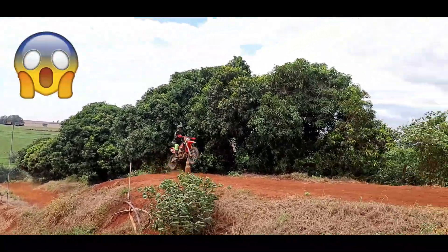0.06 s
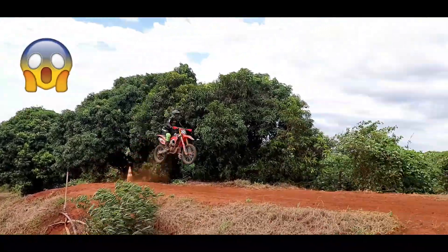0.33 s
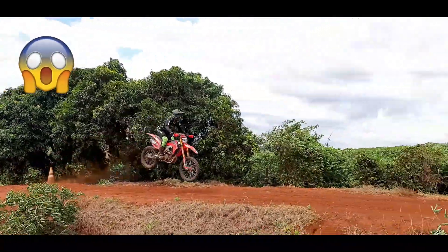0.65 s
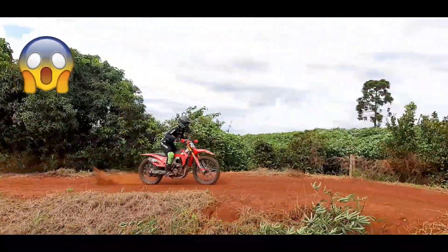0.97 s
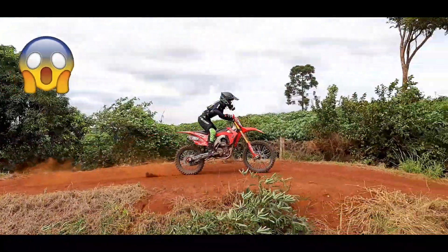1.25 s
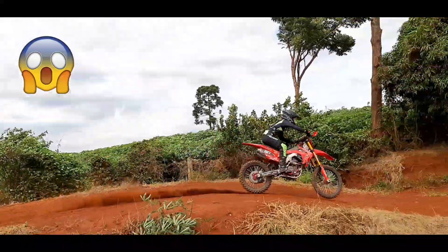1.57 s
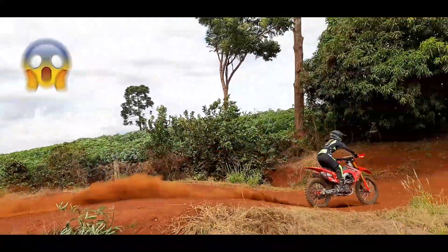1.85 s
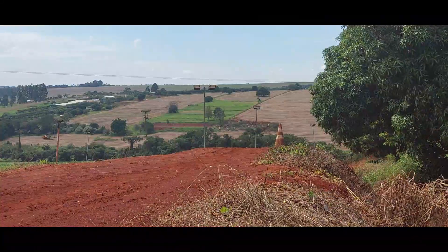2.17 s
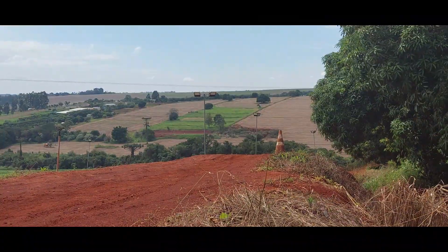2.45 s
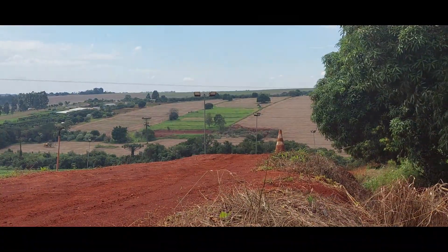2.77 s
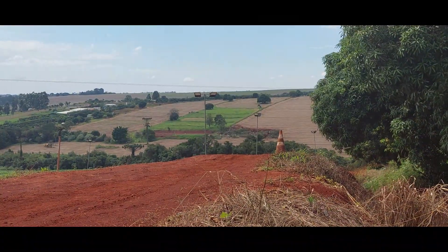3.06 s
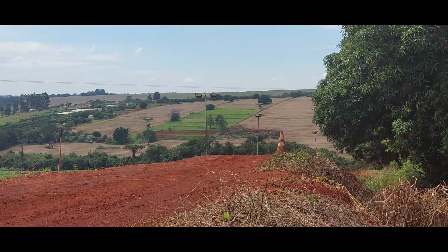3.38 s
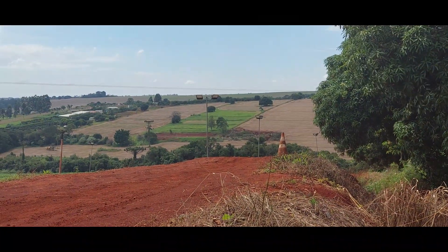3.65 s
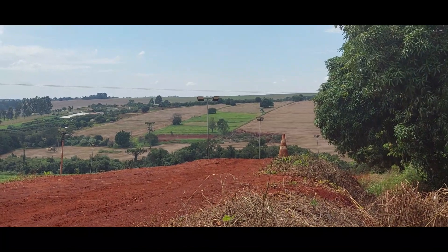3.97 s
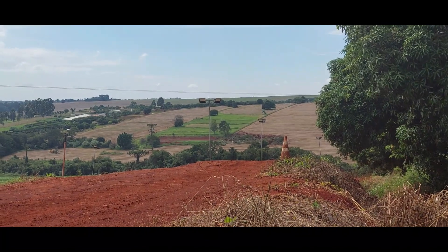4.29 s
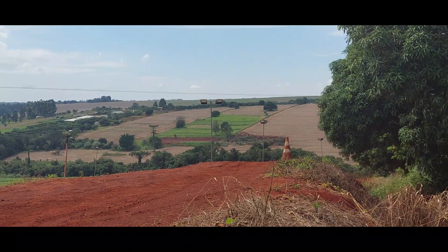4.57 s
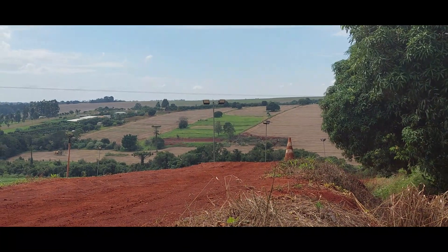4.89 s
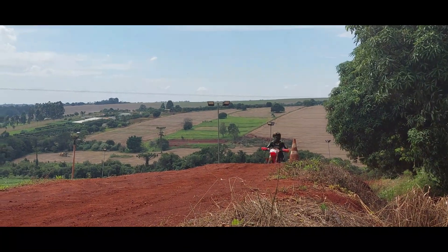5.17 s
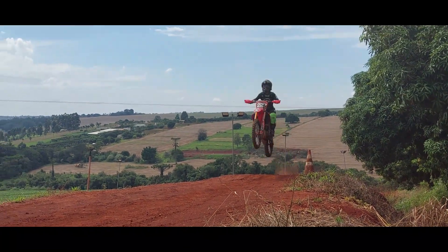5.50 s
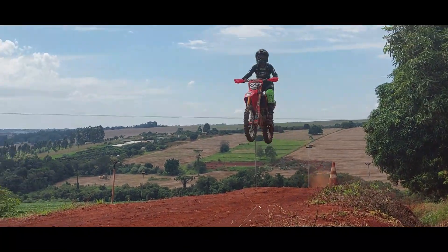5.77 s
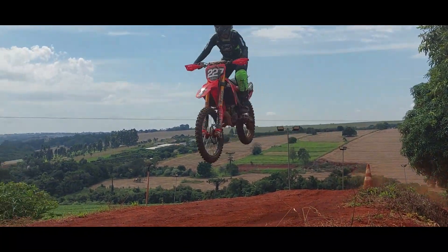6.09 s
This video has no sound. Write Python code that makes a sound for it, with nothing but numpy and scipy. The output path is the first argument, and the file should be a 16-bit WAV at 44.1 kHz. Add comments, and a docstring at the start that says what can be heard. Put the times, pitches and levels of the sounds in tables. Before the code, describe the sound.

A single-cylinder four-stroke dirt bike rides past close by on an outdoor dirt track, revving up twice with a raspy bark and brief chain and tyre scrapes. After a split-second silence it is dull and throbbing behind a hill, with a few exhaust pops. It grows louder as it climbs, its pitch wavering, then revs sharply as it leaps towards the listener. Light wind rumbles on the microphone.

```python
"""Motocross bike on a dirt track.

A single-cylinder four-stroke, heard from two places. It jumps and rides past, close and raspy; after a
short silence it climbs from behind a hill, dull and throbbing, pops on the overrun and leaps towards
the listener. Each firing rings the exhaust and the metal and lets out a puff of turbulent gas.
Chain and tyres scrape; light wind touches the microphone."""
import sys
import numpy as np
from scipy import signal
from scipy.fft import rfft, irfft
from scipy.io import wavfile
from scipy.ndimage import uniform_filter1d, minimum_filter1d

SR = 44100
rng = np.random.default_rng(int(sys.argv[2]) if len(sys.argv) > 2 else 0)


def to_wav(s):
    """Save 16-bit WAV."""
    ch = np.atleast_2d(s).T  # columns
    pcm = np.round(np.clip(ch, -1, 1) * 32767)  # PCM
    wavfile.write(sys.argv[1], SR, pcm.astype(np.int16))


N = 275184
TIME_S = np.arange(N) / SR
FREQ_HZ = np.fft.rfftfreq(N, 1 / SR)

# Wind spectrum. Each row: frequency in Hz, relative level in dB.
WIND_SPECTRUM = [(15, -26), (35, -14.5), (65, -11.5), (110, -3.5), (220, -8), (500, -50.5), (1500, -74)]
# Unsheltered wind. Each row: time in seconds, level below 50 Hz in dB.
GUSTS = [(0, -38), (.5, -50), (.95, -37), (2.15, -56), (2.35, -43.5), (3.6, -40.5), (5.4, -41.5),
         (5.8, -43), (6.24, -45)]
# Stereo width. Each row: frequency in Hz, side gain in dB.
PASS_WIDTH = [(60, -7), (110, -37), (200, -7.5), (380, -9), (700, -9.5), (1290, -7), (2380, -3.5),
              (4400, 3), (8120, 3), (15000, -2.5)]
CLIMB_WIDTH = [(60, -22), (110, -8), (200, -9.5), (380, -6), (700, -7), (1290, -5), (2380, -2.5),
               (4400, 1.5), (8120, -0.5), (15000, 1.5)]
# Bike direction. Each row: time in seconds, bearing from -1 to 1.
BEARING = [(0, 0.32), (.9, 0.68), (1.3, 0.5), (1.6, -0.51), (2.04, -0.3), (2.1, -0.73), (5, -0.025),
           (6.24, 0.29)]
# Chain and tyres. Each row: peak time in seconds, level in dB, band frequency in Hz,
# half length in seconds.
SCRAPES = [(1.016, -21, 5860, 0.018), (1.303, -31, 5100, .01), (1.363, -16.5, 3866, .012),
           (1.407, -21.5, 4950, 0.019)]
# Pops and thumps, mostly on the overrun, one as the throttle opens. Each row: start in seconds, unfiltered peak
# in dB, pitch in Hz, twice the decay time in seconds, crack in dB.
POPS = [(2.391, -18, 512.6, 0.0035, -53), (2.47, -4.5, 234, 0.0039, -49), (2.502, -22, 588.6, 0.0029, -41),
        (2.538, -12, 242, .0077, -50), (2.556, -21.5, 294.6, 0.001, -51), (2.585, -23, 679, 0.002, -40.5),
        (2.616, -2, 78, 0.003, -59), (2.886, -8.5, 108, 0.0043, -50), (4.678, -5, 264, 0.0027, -31),
        (5.288, -5.5, 110, 0.0057, -48), (5.632, -6.5, 523, 0.0014, -26), (5.967, -7, 395, 0.0092, -30)]

# Stages: coming, going by, behind the hill, in the air.
# Each row: start in seconds, end in seconds, pulse front against gas in dB.
STAGES = [(-1, 1.15, 2.5), (1.15, 2.07, 1), (2.07, 5.62, -8), (5.62, 7, 7)]
# Gas per stage. Each row: puff decay in seconds, steady flow against the puff, metal ringing in dB.
STAGE_FLOW = [(0.03, 1.2, 7), (0.033, .55, -3), (0.008, 3, -7), (0.014, 0.32, 7)]
# Balance per stage. Each row: bark against boom in dB, hiss offset in dB.
STAGE_BALANCE = [(-4.5, -16.5), (-8, -14.5), (-9.5, -27.5), (-16, -27.5)]
# Exhaust pulse and gas spectra, one list per stage. Each row: frequency in Hz, relative level in dB.
PASS_PULSE_SPECTRA = [
    [(29, -48), (50, -60), (75, -20), (154, -3), (201, -13), (237, -1.5), (275, -15.5), (336, -0.5),
     (521, 0), (788, -16), (1000, -5), (1300, -48), (2200, -120)],
    [(29, -57), (50, -32), (151, -23), (182, -8), (219, -7), (258, -20.5), (324, -6), (376, -0.5), (528, 3),
     (829, -13.5), (1000, 1), (1300, -44), (2200, -120)],
]
CLIMB_PULSE_SPECTRA = [
    [(29, -26), (50, -30.5), (70, 7.5), (97, -10.5), (135, 6.5), (173, -4), (258, 5.5), (332, -4.5),
     (583, -16.5), (850, -40), (1000, -52), (1300, -72), (2200, -120)],
    [(29, -40), (50, -16.5), (140, -1), (199, 5), (286, 2.5), (328, -9.5), (396, -12), (839, -24.5),
     (1000, -16), (1300, -57), (2200, -120)],
]
PASS_GAS_SPECTRA = [
    [(350, -36), (600, 34.5), (788, 2.5), (993, 4), (1290, -0.5), (2070, -3), (2310, 1.5), (2870, -6),
     (4090, -12), (5150, -18), (6230, -18.5), (7540, -30), (8750, -35), (12000, -22), (15500, -33.5)],
    [(350, -21), (600, 30.5), (832, -0.5), (1050, -2), (1220, -4.5), (1390, 0.5), (1640, -7.5),
     (1810, -4.5), (3240, -11.5), (4140, -11), (5440, -14.5), (7960, -33), (8870, -33.5), (11800, -27),
     (15500, -36)],
]
CLIMB_GAS_SPECTRA = [
    [(440, -0.5), (750, 13.5), (873, 0), (1070, 5), (1260, 0), (1510, 2.5), (1730, -2.5), (2040, 1),
     (2290, -10), (2630, -9.5), (2980, -17), (3610, -20.5), (4200, -20.5), (5700, -26), (15500, -33.5)],
    [(440, -37), (750, -13.5), (1490, -11.5), (1750, -19.5), (2120, -7), (2410, -20), (3990, -18),
     (6070, -26.5), (10900, -30.5), (15500, -33)],
]
# Engine case and header pipe modes. Each row: frequency in Hz, width in Hz, relative level in dB.
METAL_MODES = [(1060, 110, -8), (1560, 440, -10.5), (2327, 34, -3.5), (2643, 36, -1.5), (3125, 47, -6),
               (4200, 660, -5.5), (5190, 56, -10)]

# Engine speed before wheelspin. Each row: time in seconds, firing rate in Hz.
PASS_SPEED = [(0.0, 54), (0.167, 54), (0.258, 63.3), (0.38, 76), (0.488, 94), (0.586, 84.4), (0.627, 91),
              (0.718, 76.8), (0.867, 69), (1.04, 85), (1.117, 54.6), (1.185, 48.8), (1.307, 50.4),
              (1.487, 57), (1.567, 57), (1.657, 68.5), (1.889, 83.5), (2.04, 44)]
CLIMB_SPEED = [(2.1, 50.3), (2.183, 56.0), (2.303, 51.7), (2.524, 59.6), (2.68, 48.4), (2.915, 54.09),
               (3.362, 52.18), (3.509, 58.7), (3.725, 58.8), (3.917, 65.88), (4.02, 60.38), (4.206, 65.76),
               (4.481, 67.03), (4.816, 72.98), (5.022, 74.13), (5.3, 71.73), (5.595, 53.06)]
LEAP_SPEED = [(5.693, 65.05), (5.797, 87.74), (5.922, 104.4), (6.027, 97.9), (6.088, 99.4), (6.24, 81.9)]
# Rear wheel slips. Each row: peak time in seconds, extra firing rate in Hz, rise in seconds.
WHEELSPINS = [(2.821, 16.9, 0.14), (3.096, 32.2, 0.185), (3.303, 11.4, 0.094), (3.447, 9.3, 0.094),
              (3.615, 6.8, 0.074), (3.843, 12.0, 0.1), (4.135, 5.03, 0.1), (4.32, 8.4, 0.1),
              (4.434, 9.1, 0.067), (4.58, 9.24, 0.096), (4.719, 5.47, 0.097)]
# Throttle. Each row: opening and closing in seconds, bite 0-1, settling in seconds, final roughness 0-1.
THROTTLE_PULLS = [(.15, 1, 0.93, 0.27, 0.22), (1.215, 1.909, 0.85, 0.36, .12),
                  (2.053, 2.259, 0.15, .05, 0.18), (2.877, 3.09, 0.12, .1, 0.25),
                  (3.213, 4.449, 0.09, 0.13, 0.33), (4.923, 5.184, 0.28, 0.043, .2),
                  (5.609, 6.3, 0.88, .12, .08)]
# Brief sags and swells of the note. Each row: time in seconds, half length in seconds, change in dB.
LURCHES = [(0.891, 0.027, -7.5), (1.114, 0.031, 7), (1.18, 0.019, -3), (2.408, .018, -7),
           (3.163, .046, -2.5), (4.657, 0.064, -4.5), (4.898, 0.031, -7), (5.253, 0.027, -3),
           (5.398, 0.067, -2.5), (5.5, 0.088, 1.5), (5.584, .02, -8), (6.023, 0.052, -4)]
# Bass and treble levels over time; the hill hides the treble most, and the bass dips briefly near 0.5 s. Each
# row: time in seconds, bass and treble in dB.
PASS_LEVELS = [(0, -24, -26.5), (.25, -20, -22.5), (.52, -27.5, -21.5), (.8, -22.5, -23.5),
               (1.15, -21, -25), (1.42, -19, -20), (1.55, -20, -25), (1.8, -17.5, -21.5),
               (2.04, -25.5, -26.5)]
CLIMB_LEVELS = [(2.1, -27, -52.5), (2.75, -24, -54), (2.98, -18.5, -47.5), (3.2, -18.5, -46.5),
                (3.65, -12.5, -40), (4.3, -12, -36.5), (4.75, -12, -38), (5.05, -13.5, -33.5),
                (5.58, -13, -34.5), (5.88, -12, -29.5), (6.24, -16, -31.5)]
# Growth of boom, bark, rasp and hiss. Each row: dB at full bite, dB per octave of engine speed.
LOAD_RESPONSE = [(2.95, -2), (11, 0.5), (5, 4), (4.5, 6)]
# Low exhaust orders. Each row: time in seconds, orders 1 to 4 against the boom in dB.
PASS_ORDERS = [(0, -22.5, -10.5, -3.5, -8.5), (0.3, -22, -14, -11, -7), (0.5, -5.5, 1, -11.5, -1.5),
               (0.68, -20.5, -5.5, -10, 7), (0.95, -25, -4, -10, -19.5), (1.3, -33.5, -22, -13, -6.5),
               (1.75, -15.5, -6.5, -12.5, -18.5), (2.04, -15, -4.5, 2.5, -3)]
CLIMB_ORDERS = [(2.1, -8.5, -9, -7.5, -2), (2.75, -19, -19, -15, -6.5), (3.08, -1.5, -4, -10.5, -4.5),
                (3.3, -15, -7, -16.5, -1.5), (4.0, -11, -6, -7.5, 0), (4.45, -14.5, -12.5, -4.5, -5.5),
                (4.8, -7.5, -5, -13.5, -5.0), (5.199, -14, -1.5, -4.5, -3.5),
                (5.38, -18.5, -13, -29, -14.5), (5.48, -12, -3.5, 3.5, -8), (5.72, -13, -11.5, -7.5, -4.5),
                (5.93, -6.5, -2.5, -7.5, -18), (6.24, -12.5, -1, 2, -3.5)]


def amp(db):
    """Decibels to gain."""
    return 10 ** (np.asarray(db) / 20)


def unit_rms(x):
    """Scales to unit rms."""
    return x / np.sqrt(np.mean(x ** 2) + 1e-20)


def smooth(x, window_s):
    """Hann-weighted moving average."""
    window = np.hanning(int(window_s * SR) | 1)
    return signal.oaconvolve(x, window / window.sum(), 'same')


def steady_rms(x):
    """Unit rms over every few firings."""
    return x / np.sqrt(abs(smooth(x ** 2, window_s=.12)) + 1e-4 * np.mean(x ** 2))


def curve(table, column=1):
    """One table column on the time axis."""
    table = np.array(table, float)
    return np.interp(TIME_S, table[:, 0], table[:, column])


def ramp(start_s, length_s):
    """Linear rise from 0 to 1."""
    return np.clip((TIME_S - start_s) / max(length_s, 1e-3), 0, 1)


def bump(peak_s, half_s):
    """Gaussian swell of height 1."""
    return np.exp(-((TIME_S - peak_s) / half_s) ** 2)


def spectrum_db(table):
    """A table interpolated over log frequency."""
    hz, db = np.transpose(table)
    return np.interp(np.log(FREQ_HZ + 1), np.log(hz + 1), db)


def colour(x, response):
    """Filters by a frequency response."""
    return irfft(rfft(x) * response, N)


def band(x, lo_hz, hi_hz, order=10):
    """Band-pass whose neighbours sum flat."""
    return colour(x, 1 / (1 + (FREQ_HZ / hi_hz) ** order) - 1 / (1 + (FREQ_HZ / lo_hz) ** order))


def resonate(x, gain_db):
    """Minimum-phase filter: ringing follows each click."""
    cepstrum = irfft(np.log(amp(np.maximum(gain_db, -100))), N)
    cepstrum[1:N // 2] *= 2
    cepstrum[N // 2 + 1:] = 0
    return colour(x, np.exp(rfft(cepstrum)))


def wander(hz):
    """Low-passed random drift, unit rms."""
    return unit_rms(colour(rng.standard_normal(N), np.exp(-(FREQ_HZ / hz) ** 2)))


def wind():
    """Lumpy rumble on the microphone, partly shared between channels."""
    shared, left, right = (
        resonate(rng.standard_normal(N), spectrum_db(WIND_SPECTRUM)) * amp(2 * wander(hz=33))
        for _ in range(3))
    rumble = shared + 4.7 * np.array([left, right])
    return amp(curve(GUSTS)) * rumble / np.std(band(rumble.mean(0), 15, 50))


def reflections(x, t60_s, first_s=.0028):
    """Scatter from earth banks and trees; three sets take turns as the bike moves."""
    t = np.arange(SR // 2) / SR
    echoes = 0
    for k in range(3):
        taps = rng.standard_normal(len(t)) * amp(-60 * t / t60_s) * (t > first_s)
        fade = np.cos(np.pi * (2.2 * TIME_S + k / 3))
        echoes += fade * signal.fftconvolve(x, taps / np.linalg.norm(taps))[:N]
    return echoes / np.sqrt(3 / 2)


def microphone_pair(x, width):
    """Stereo from a bearing-dependent phase difference plus diffuse reflections."""
    bearing = np.clip(curve(BEARING), -1, 1)
    direct = -bearing * signal.hilbert(x).imag
    diffuse = np.sqrt(1 - bearing ** 2) * reflections(x, t60_s=.2)
    side = colour(direct + diffuse, amp(spectrum_db(width)))
    return np.array([x + side, x - side])


def scrapes(grit_db=2, top_db=-13):
    """Bright swells of gritty noise as the wheels land and bite."""
    grit = rng.standard_normal(N) * amp(grit_db * wander(hz=400))
    top = amp(top_db) * unit_rms(band(grit, 10000, 18000, order=6))
    return sum(amp(db) * (unit_rms(band(grit, hz / 1.9, hz * 1.15, order=6)) + top) * bump(peak_s, half_s)
               for peak_s, db, hz, half_s in SCRAPES)


def pops(crack_decay_s=.0072):
    """Heavily damped pressure blasts, each with a bright crack at its front."""
    crackle = unit_rms(band(rng.standard_normal(N), 590, 2700, order=7))
    out = np.zeros(N)
    for start_s, peak_db, hz, length_s, crack_db in POPS:
        t = np.maximum(TIME_S - start_s, 0)
        blast = -t * np.exp(-2 * t / length_s) * np.sin(2 * np.pi * hz * t)
        crack = crackle * (t > 0) * np.exp(-t / crack_decay_s)
        out += amp(peak_db) * blast / abs(blast).max() + amp(crack_db) * crack
    return band(out, 33, 3000, order=4)


def stage_shares():
    """Cross-fade weights of the four stages."""
    return np.array([uniform_filter1d(1. * ((TIME_S > start_s) & (TIME_S < end_s)), size=2600)
                     for start_s, end_s, _ in STAGES])


def wheelspin_hz(grip_s=.07):
    """Extra firing rate: the rear wheel breaks loose on bumps, then grips again."""
    return sum(extra_hz * (ramp(peak_s - rise_s, rise_s) - ramp(peak_s, grip_s))
               for peak_s, extra_hz, rise_s in WHEELSPINS)


def throttle(travel_s=.054, closed_rough=.68, rough_per_db=.13, flutter_db=1.5):
    """A pull adds bite, then evens the burn; lurches roughen it, and a rough burn flutters."""
    bite, rough = 0, closed_rough
    for open_s, close_s, strength, settle_s, open_rough in THROTTLE_PULLS:
        shut = ramp(close_s, travel_s)
        bite += strength * (ramp(open_s, travel_s) - shut)
        rough += (open_rough - closed_rough) * (ramp(open_s, settle_s) ** 2 - shut)
    lurch_db = sum(db * bump(peak_s, half_s) for peak_s, half_s, db in LURCHES)
    rough = np.clip(rough + rough_per_db * abs(lurch_db), 0, 1)
    return bite, rough, lurch_db + flutter_db * rough * wander(hz=16)


def band_levels_db(rate_hz, bite, unsteady_db, cruise_hz=70, spin_db_per_hz=.1648):
    """Boom, bark, rasp and hiss levels from the bass and treble levels, throttle and engine speed."""
    levels = np.vstack([PASS_LEVELS, CLIMB_LEVELS])
    bass_db, treble_db = curve(levels) + unsteady_db, curve(levels, 2)
    bark_db, hiss_db = np.transpose(STAGE_BALANCE) @ stage_shares()
    rasp_db = treble_db + spin_db_per_hz * wheelspin_hz() + .35 * np.minimum(unsteady_db, 0)
    base_db = bass_db, bass_db + bark_db, rasp_db, .57 * treble_db + hiss_db
    octaves = np.log2(rate_hz / cruise_hz)
    return [db + bite_db * bite + octave_db * octaves
            for db, (bite_db, octave_db) in zip(base_db, LOAD_RESPONSE)]


def firings(cycles, rough, uneven_db=4, jitter_s=.0005):
    """One click per cycle, with the latest one's age and size; a rough burn varies size and timing."""
    at = np.flatnonzero(np.diff(np.floor(cycles)))
    slip, strength = rng.standard_normal((len(at), 2)).T
    size = amp(uneven_db * rough[at] * np.clip(strength, -2, 1))
    shift = np.round(jitter_s * SR * rough[at] * slip).astype(int)
    at = np.sort(np.clip(at + shift, 0, N - 1))
    clicks = np.zeros(N)
    clicks[at] = size
    latest = np.maximum(np.searchsorted(at, np.arange(N), 'right') - 1, 0)
    return unit_rms(clicks), abs(TIME_S - TIME_S[at[latest]]), size[latest]


def pulse_fronts(clicks, rough, cutoff_hz=2800):
    """The steep front of each pulse cracks, most clearly in an even burn."""
    fronts = (1 - rough) * unit_rms(clicks + 1.8 * reflections(clicks, t60_s=.05))
    return colour(fronts, 1 / np.sqrt(1 + (FREQ_HZ / cutoff_hz) ** 4))


def metal_lift_db(ring_db):
    """Case and header pipe resonances lift the rasp."""
    lift = sum(amp(db + ring_db) / (1 + (2 * (FREQ_HZ - hz) / width_hz) ** 2)
               for hz, width_hz, db in METAL_MODES)
    return 20 * np.log10(1 + lift)


def exhaust(cycles, rough, churn_db=-2):
    """Pulses ring the pipe (throb); gas puffs and pulse fronts ring the metal (rasp)."""
    clicks, age_s, size = firings(cycles, rough)
    fronts = pulse_fronts(clicks, rough)
    turbulence = rng.standard_normal(N)
    stages = zip(stage_shares(), STAGES, STAGE_FLOW,
                 PASS_PULSE_SPECTRA + CLIMB_PULSE_SPECTRA, PASS_GAS_SPECTRA + CLIMB_GAS_SPECTRA)
    throb = rasp = 0
    for share, (_, _, front_db), (puff_s, steady, ring_db), pulse_spectrum, gas_spectrum in stages:
        gas = unit_rms((steady + size * np.exp(-age_s / puff_s)) * turbulence)
        pipe = resonate(clicks + amp(churn_db) * rough * gas, spectrum_db(pulse_spectrum))
        metal = resonate(gas + amp(front_db) * fronts, spectrum_db(gas_spectrum) + metal_lift_db(ring_db))
        throb += share * unit_rms(pipe)
        rasp += share * unit_rms(metal)
    return throb + amp(-12) * reflections(throb, t60_s=.16), rasp


def pipe_orders(x, cycles, boom_db):
    """Sets the low orders to their tabled levels: pipe tuning and ground reflection lift or cancel them."""
    orders = np.vstack([PASS_ORDERS, CLIMB_ORDERS])
    for k in range(1, orders.shape[1]):
        carrier = np.exp(2j * np.pi * k * cycles)
        order = smooth(x / carrier, window_s=.07)
        gain = amp(boom_db + curve(orders, k)) / np.sqrt(2) / (abs(order) + 1e-9)
        x = x + 2 * (carrier * order * (gain - 1)).real
    return x


def engine(between_orders_db=-1.5):
    """Firings drive the exhaust, heard in four bands; close by, chain and tyres make the hiss uneven."""
    rate_hz = curve(np.vstack([PASS_SPEED, CLIMB_SPEED, LEAP_SPEED])) + wheelspin_hz()
    cycles = np.cumsum(rate_hz) / SR
    bite, rough, unsteady_db = throttle()
    boom_db, bark_db, rasp_db, hiss_db = band_levels_db(rate_hz, bite, unsteady_db)
    throb, treble = exhaust(cycles, rough)
    nearness = np.interp(hiss_db, (-48, -28), (.3, 1))
    clatter = amp(nearness * (wander(hz=250) + 1.28 * wander(hz=21)))
    boom = amp(boom_db + between_orders_db) * steady_rms(band(throb, 45, 330))
    bark = amp(bark_db) * steady_rms(band(throb, 330, 800))
    rasp = amp(rasp_db) * steady_rms(band(treble, 800, 3000))
    hiss = amp(hiss_db) * steady_rms(clatter * band(treble, 3000, 20000))
    return pipe_orders(boom + bark, cycles, boom_db) + rasp + hiss


def scene(pass_end_s=2.038, climb_start_s=2.101, shelter_db=-5.5):
    """The close pass, sheltered from the wind; a short silence; the climb and leap."""
    bike = (engine() + scrapes() + pops()) * signal.windows.tukey(N, .002)
    air = wind()
    close_pass = microphone_pair(bike, PASS_WIDTH) + amp(shelter_db) * air
    climb = microphone_pair(bike, CLIMB_WIDTH) + air
    pass_gate = uniform_filter1d(1. * (TIME_S < pass_end_s), size=200)
    climb_gate = uniform_filter1d(1. * (TIME_S > climb_start_s), size=200)
    return pass_gate * close_pass + climb_gate * climb


def record(dry):
    """Fast limiter at full scale, then a low-pass."""
    ceiling_gain = np.minimum(1, 1 / (abs(dry).max(0) + 1e-9))
    limited = dry * uniform_filter1d(minimum_filter1d(ceiling_gain, size=161), size=161)
    lowpass = signal.firwin(511, cutoff=15750, window=("kaiser", 9), fs=SR)
    return signal.oaconvolve(limited, lowpass[None], "same")


dry = scene()
out = record(dry)
to_wav(out)
```